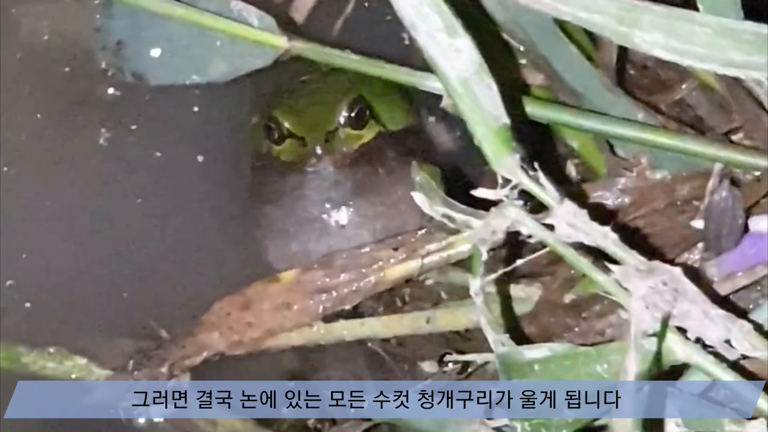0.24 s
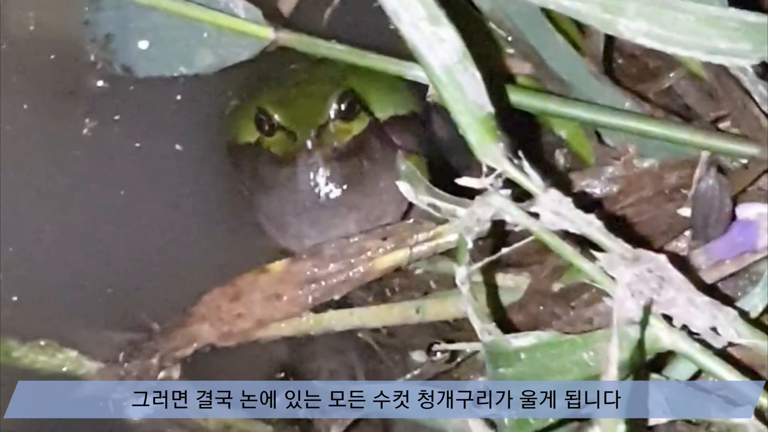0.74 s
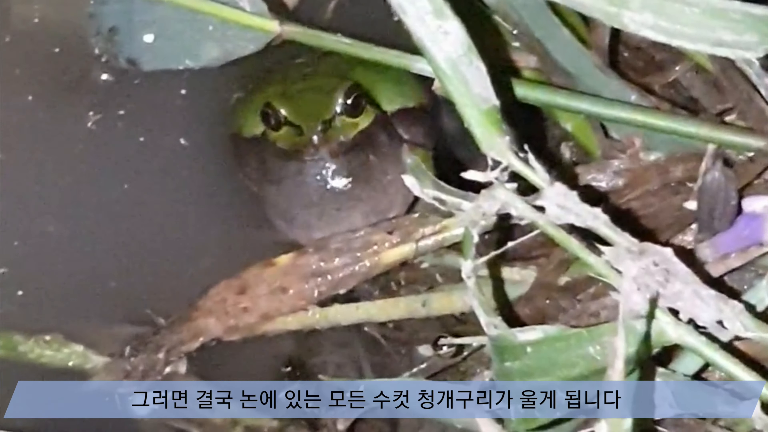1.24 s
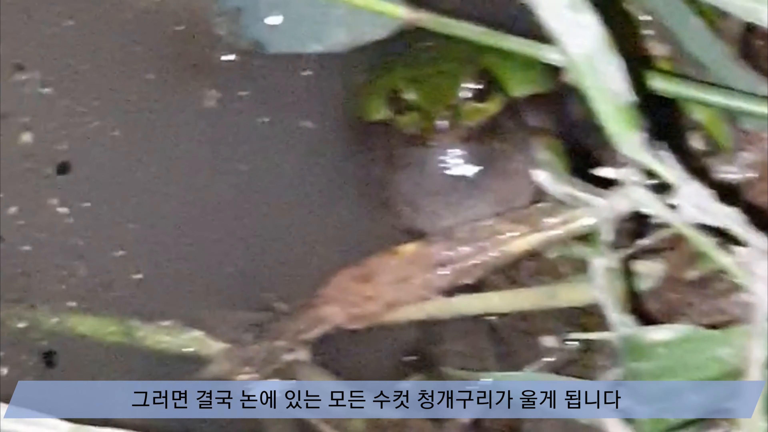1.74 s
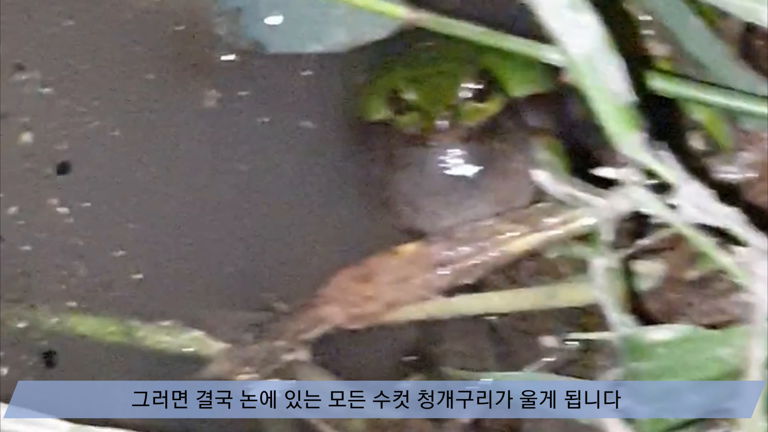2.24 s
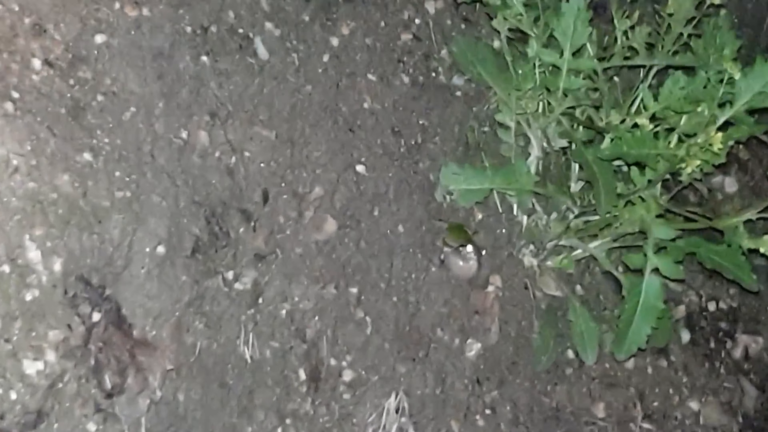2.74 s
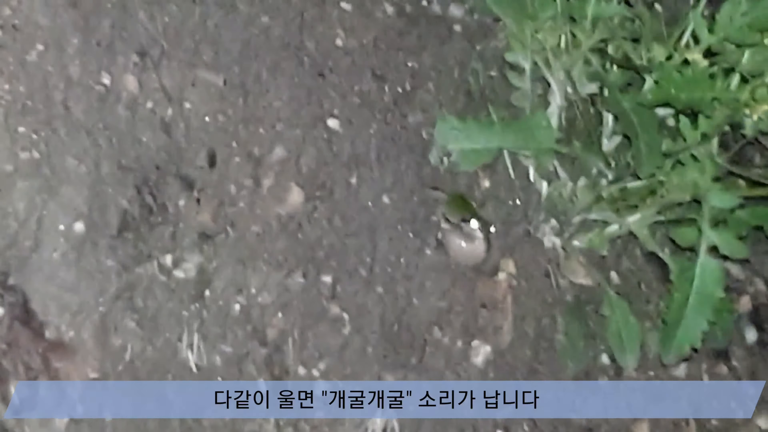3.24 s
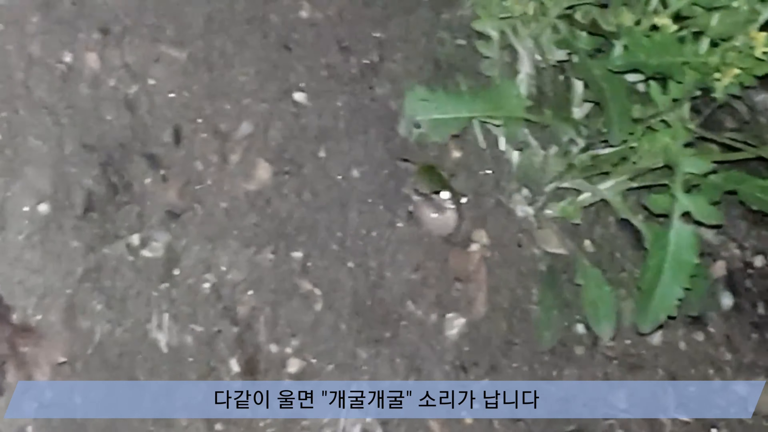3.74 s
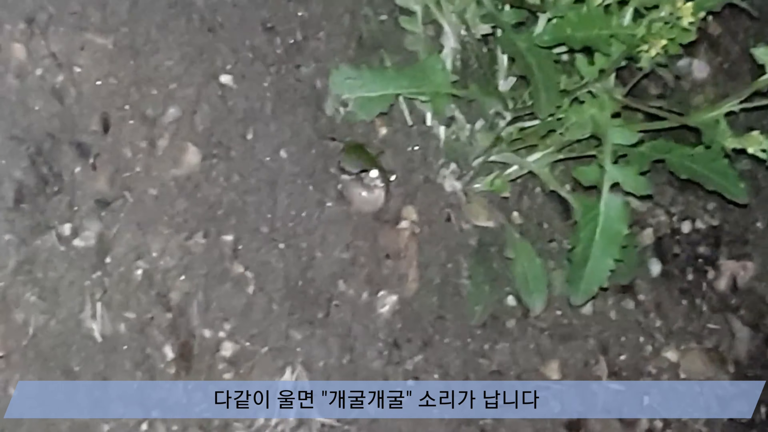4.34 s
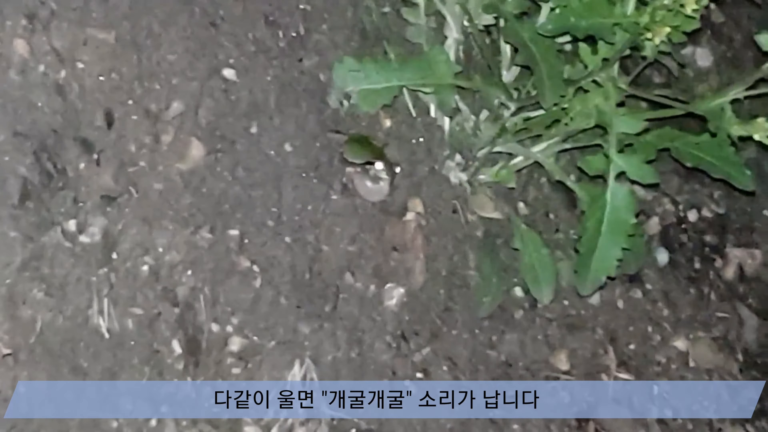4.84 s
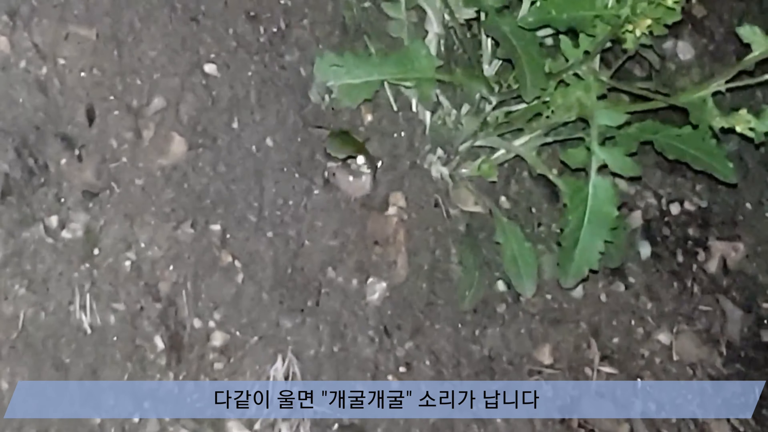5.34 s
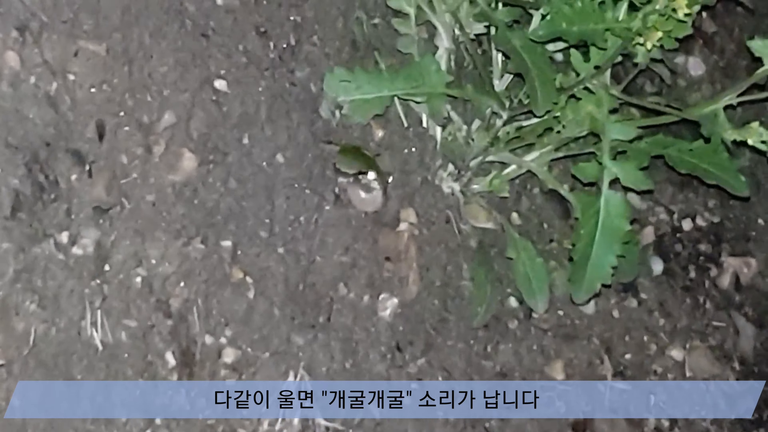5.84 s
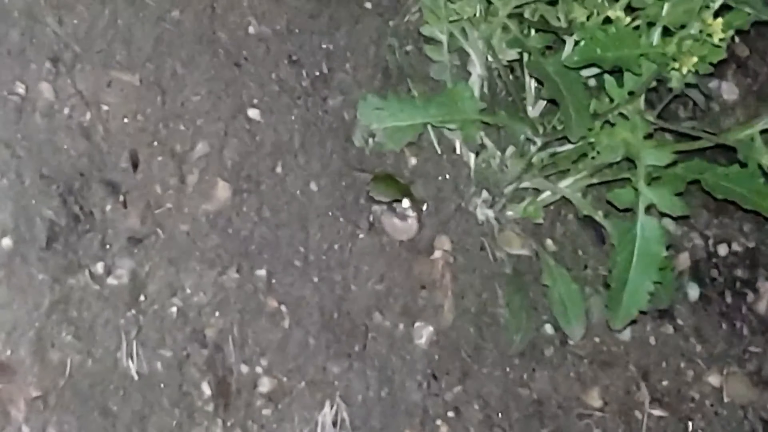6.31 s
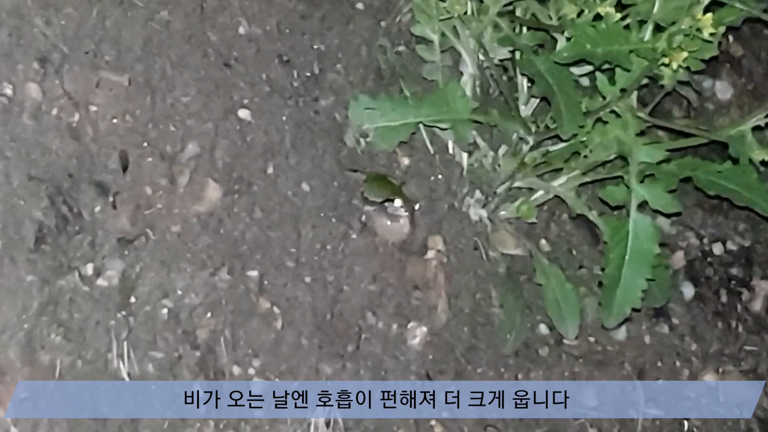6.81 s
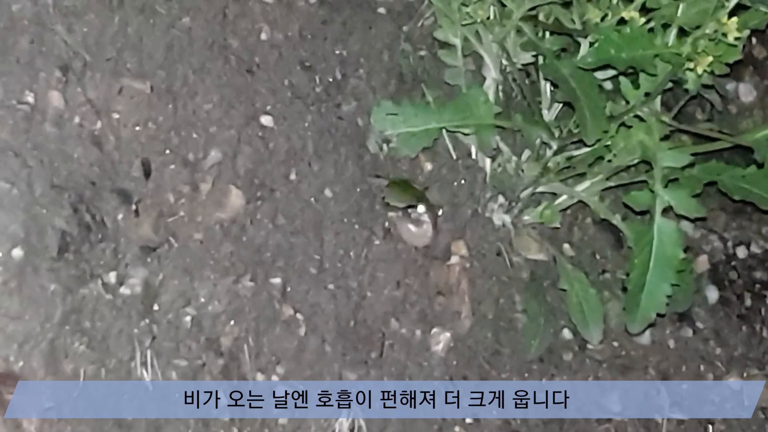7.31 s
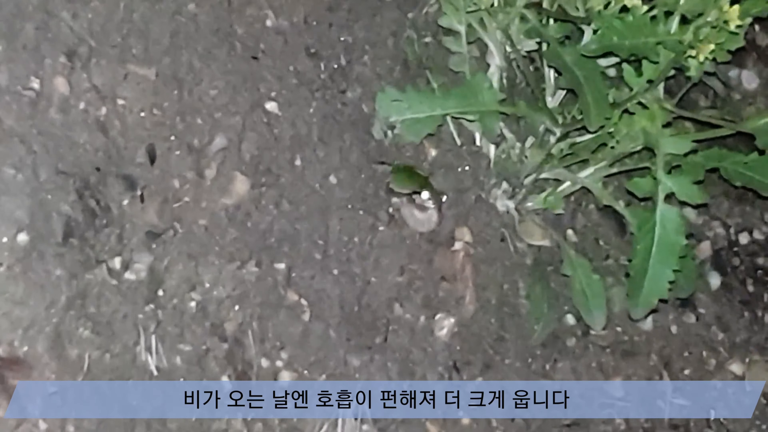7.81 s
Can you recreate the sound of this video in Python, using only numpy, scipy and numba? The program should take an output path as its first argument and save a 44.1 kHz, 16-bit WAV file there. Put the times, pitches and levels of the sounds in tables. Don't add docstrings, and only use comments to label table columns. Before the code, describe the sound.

Night pond frogs: spaced buzzy croaks with a thick chattering chorus, a hard cut, then one close frog repeating rapid croaks on a muddy bank.

```python
import sys
import numpy as np
from scipy import signal
from scipy.fft import rfft, irfft
from scipy.io import wavfile
from scipy.ndimage import uniform_filter1d
from numba import njit

SR = 44100
rng = np.random.default_rng(int(sys.argv[2]) if len(sys.argv) > 2 else 0)


def store_pcm(level_fs):
    pcm = np.round(np.clip(level_fs, -1, 1) * 32767).astype(np.int16)
    wavfile.write(sys.argv[1], SR, np.atleast_2d(pcm).T)


def volts_from_db(level):
    exponent = np.asarray(level, float) / 20
    return 10 ** exponent


N = 355887
T = np.arange(N) / SR
CUT_S, RESUME_S = 2.383, 2.458


def level(x, db):
    return x * volts_from_db(db) / np.sqrt(np.mean(x ** 2))


def curve(rows):
    s, *columns = np.transpose(rows)
    return [np.interp(T, s, c) for c in columns]


def coloured(points):
    hz, db = np.transpose(points)
    f = np.arange(N // 2 + 1) * SR / N + 1e-3
    gain = volts_from_db(np.interp(np.log(f), np.log(hz), db, left=-90))
    return level(irfft(rfft(rng.standard_normal((2, N))) * gain, N), 0)


def walk(rate_hz):
    k = int(SR / rate_hz)
    held = np.repeat(rng.standard_normal(N // k + 1), k)
    return uniform_filter1d(uniform_filter1d(held, k), k)[:N]


@njit
def add_rings(out, s, hz, ring_s, gain, phase):
    for k in range(len(s)):
        first = int(np.floor(s[k] * SR)) + 1
        rate = 2j * np.pi * hz[k] - 1 / ring_s[k]
        z = gain[k] * np.exp(3 + 1j * phase[k] + rate * (first / SR - s[k]))
        step = np.exp(rate / SR)
        for i in range(first, min(first + int(13 * ring_s[k] * SR), len(out))):
            if i >= 0:
                out[i] += ((i / SR - s[k]) / ring_s[k] / 3) ** 3 * z.imag
            z *= step


def echoes(x, t60_s, wet_db, start_ms):
    t = np.arange(int(.4 * SR)) / SR
    tail = rng.standard_normal((2, len(t))) * np.exp(-np.log(1000) * t / t60_s) * (t > start_ms / 1000)
    tail = tail * volts_from_db(wet_db) / np.sqrt(np.sum(tail ** 2, axis=1, keepdims=True))
    return x + signal.fftconvolve(x, tail, axes=1)[:, :N]


def small_source(x, hz, leak_db):
    steep = signal.sosfilt(signal.ellip(4, .5, abs(leak_db), hz, "high", fs=SR, output="sos"), x)
    return signal.sosfilt(signal.butter(2, 0.49 * hz, "high", fs=SR, output="sos"), steep)


# (share of pulses, gap [ms])
PACE = [(0, 8.6), (0.142, 8.0), (0.273, 7.2), (0.621, 6.9), (0.823, 6.3), (0.924, 6.6), (.999, 5.7)]


def pulse_times(marks, times, count):
    gaps = np.interp(np.linspace(0, 1, count - 1), *np.transpose(PACE))
    clock = np.concatenate([[0], np.cumsum(gaps)])
    return np.interp(clock, clock[marks], times)


# (share of pulses, level [dB])
EFFORT = [(0, -3.5), (.07, -0.4), (.2, 2.5), (.4, 3.5), (.85, 3.5), (.93, 0.5), (.999, 3)]
# (frequency [Hz], density [dB per Hz])
RUSH = [(2500, -19), (4500, -6), (6000, 2.5), (7000, 6), (10000, -6.5), (12000, -8.5), (14500, -18),
        (16000, -23.5)]
LEAD_S = 0.000458
SLACK_SHARE = 0.16
LAST_SAG = 0.082


def frog(calls, counts, marks, sac, waver, last_ring, bright_db, pitch=0.94, rush_db=None,
         upper_lag_ms=0, lower_lag_ms=0, fade_db=0, twist_rad=0, climb=0.73, shy_db=0):
    s = np.concatenate([pulse_times(marks, c[:-1], n) for c, n in zip(calls, counts)]) - LEAD_S
    share = np.concatenate([np.linspace(0, 1, n) for n in counts])
    last = share == 1
    slack = np.exp(-share / SLACK_SHARE)
    db = np.repeat([c[-1] for c in calls], counts) + np.interp(share, *np.transpose(EFFORT))
    db = db - 2500 * (share == 0) * np.maximum(np.diff(s, append=s[-1]) - .0093, 0)
    db = db - shy_db * slack
    ring = np.where(last, last_ring, 1.)
    out = np.zeros((2, N))
    for hz0, hz1, ring_ms, left_db, right_db, lead_rad in sac:
        is_upper = hz0 > 2000
        chance = rng.standard_normal((len(s), 4)).T
        loose = waver * min(hz0 / 1500, 2.6) ** 1.5
        hz = pitch * (hz0 + (hz1 - hz0) * share ** climb)
        hz = hz * (1 + .015 * loose * chance[0] - LAST_SAG * last)
        mode_db = db + loose * chance[3]
        mode_db = mode_db - bright_db * slack * min(np.log2(hz0 / 1500), 1)
        mode_db = mode_db - last * (11 if is_upper else 2.5)
        mode_db = mode_db - fade_db * (share - .5) * (hz0 > 5000)
        ring_s = ring * ring_ms / 1000
        rise_s = 3 * ring_s - (upper_lag_ms if is_upper else lower_lag_ms) / 1000
        slip = twist_rad * (1 - share) ** 1.5 * (hz0 < 2000)
        for port, port_db in enumerate((left_db, right_db)):
            phase = np.pi / 2 - 2 * np.pi * hz * rise_s + port * lead_rad + slip
            phase = phase + .45 * loose * chance[1 + port]
            add_rings(out[port], s - rise_s, hz, ring_s, volts_from_db(mode_db + port_db), phase)
    if rush_db is None:
        return out
    puffs = np.zeros(N)
    puff_db = db + rush_db - 4.5 * (share < .1) - 0.49 * share
    add_rings(puffs, s - .0016, 0 * s, np.full(len(s), .00065), volts_from_db(puff_db), 0 * s + np.pi / 2)
    return out + puffs * coloured(RUSH)


# (first pulse [s], second [s], fourth [s], last [s], level [dB])
POND = [
    (.0125, .0208, .0361, .1027, -14),
    (.3663, .3787, .3936, .4636, -13.5),
    (.6664, .6768, .693, .764, -13.5),
    (.9794, .9892, 1.0054, 1.0756, -13.5),
    (1.5629, 1.5757, 1.5905, 1.6586, -14),
    (2.3275, 2.3357, 2.3509, 2.4205, -15.2),
]
# (start [Hz], end [Hz], ring [ms], left [dB], right [dB], right phase lead [rad])
POND_SAC = [(1230, 1434, 0.75, -5, -13.5, 1), (1490, 1784, 0.58, -9, -6, 0.25),
            (2070, 2480, 0.88, -17, -8, 1.5), (2540, 2836, 1, -11.5, -2, -2),
            (2930, 3230, 0.32, -3, -9, -3), (4340, 4720, 0.5, -20.5, -23, 1.26),
            (5360, 5850, 0.21, -20.5, -22.5, 1.5), (6120, 7200, 0.98, -33, -28, -2),
            (6900, 8500, 0.38, -28.5, -29.5, -2), (794, 785, 0.53, -19, -18.5, -1),
            (9200, 8800, 0.5, -48, -40, 3), (12600, 15000, 0.29, -53.5, -59, 3.5)]


def pond_male():
    voice = frog(POND, [16] * len(POND), [0, 1, 3, -1], POND_SAC, waver=.15, last_ring=2.1,
                 fade_db=9, bright_db=1.5, twist_rad=3.6, climb=.55, shy_db=1.5, rush_db=-40,
                 upper_lag_ms=0.15)
    return echoes(voice, t60_s=.04, wet_db=-17, start_ms=1.5)


BOUNCE_MS, BOUNCE_DB = (1.95, 2.084), (-12.5, -11)


def bounce(x):
    dull = signal.sosfilt(signal.butter(2, 2430, fs=SR, output="sos"), x)
    late = [volts_from_db(db) * np.interp(T - ms / 1000, T, port)
            for port, ms, db in zip(dull, BOUNCE_MS, BOUNCE_DB)]
    return x + np.array(late)


# (first pulse [s], fourth [s], last [s], level [dB])
BANK = [(2.5756, 2.5995, 2.6733, -18.4), (2.8417, 2.8651, 2.9385, -18.5), (3.1067, 3.1303, 3.2044, -18.5),
        (3.3742, 3.398, 3.4725, -18.7), (3.639, 3.663, 3.7369, -18.5), (3.9054, 3.9297, 4.0041, -18.5),
        (4.1756, 4.1994, 4.2732, -17.9), (4.4417, 4.4669, 4.5418, -15.6), (4.7258, 4.7513, 4.8257, -14.4),
        (5.153, 5.179, 5.2582, -13.7), (5.5519, 5.578, 5.6572, -13.9), (5.8258, 5.8506, 5.9253, -13.9),
        (6.0941, 6.1193, 6.1934, -14.0), (6.3625, 6.3877, 6.462, -13.8), (6.753, 6.7803, 6.8622, -13.9),
        (7.0256, 7.0509, 7.1246, -13.8), (7.2978, 7.3237, 7.3987, -13.8), (7.5685, 7.595, 7.6708, -13.9),
        (7.8445, 7.8713, 7.9473, -13.9)]
# (start [Hz], end [Hz], ring [ms], left [dB], right [dB], right phase lead [rad])
BANK_SAC = [(1674, 1809, 0.54, -2.5, -7.5, 0.049), (1880, 2140, 0.64, -16, -31.5, 0.28),
            (3287, 3600, 0.42, -2.5, -7.5, 1.1), (3066, 3344, 1, -21, -18, 0.8),
            (2335, 2797, 0.74, -22, -16, 2.1), (2420, 2430, 0.19, -28.5, -11, 0.97),
            (4280, 4390, 0.62, -41, -29, 0.99), (4900, 5550, 0.31, -29.5, -32, 1.58),
            (6800, 7050, 0.28, -36.5, -34, 2.2), (12500, 13000, 0.3, -57, -55, 0.28),
            (9900, 11640, 0.35, -45, -43.5, 1.9), (980, 1060, 0.26, -17, -16.5, 0.099)]
LONG_CALL_S = .104


def bank_male():
    counts = [15 + (c[2] - c[0] > LONG_CALL_S) for c in BANK]
    voice = frog(BANK, counts, [0, 3, -1], BANK_SAC, waver=.1, last_ring=1.5, bright_db=6.5,
                 twist_rad=2.65, rush_db=-41, upper_lag_ms=0.44, lower_lag_ms=-.22)
    return echoes(bounce(voice), t60_s=0.04, wet_db=-13, start_ms=2.2)


TRY_S, TRY_DB, TRY_HZ = .0125, -21, 1730


def tries():
    s, *_, db = np.transpose(BANK)
    early, spread_db = rng.standard_normal((len(s), 2)).T
    out = np.zeros(N)
    gain = volts_from_db(db + TRY_DB + 2.0 * spread_db)
    add_rings(out, s - TRY_S + 0.001 * early, 0 * s + TRY_HZ, 0 * s + 0.00039, gain, 0 * s)
    return np.array([out, 0.21 * out])


def answering(calls, sac):
    calls = [(s, s + length, db) for s, length, db in calls]
    voice = frog(calls, [16] * len(calls), [0, -1], sac, waver=.15, last_ring=2.6, bright_db=8,
                 rush_db=-31, climb=.65, shy_db=3)
    return echoes(voice, t60_s=.07, wet_db=-16, start_ms=2)


# (first pulse [s], length [s], level [dB])
POND_HIGH = [
    (.0, 0.14, -31),
    (.284, 0.15, -32),
    (.584, 0.12, -34.5),
    (.89, 0.112, -32.5),
    (1.172, 0.11, -34),
    (1.452, 0.113, -33.5),
    (1.746, .112, -34),
    (2.016, 0.11, -33.5),
    (2.295, 0.11, -32),
]
POND_LOW = [
    (.175, 0.084, -36),
    (.48, 0.081, -36.5),
    (.8, 0.096, -40.5),
    (1.07, 0.079, -40),
    (1.3, .1, -35.5),
    (1.62, 0.067, -37),
    (1.875, 0.098, -36),
    (2.15, 0.09, -34.5),
]
BANK_MATE = [(3.76, 0.12, -53.5), (4.603, 0.1, -49.5), (4.9025, 0.096, -37), (5.309, 0.11, -37),
             (5.611, 0.097, -36), (5.883, 0.104, -35.5), (6.0, 0.1, -47.5), (6.164, .099, -36.5),
             (6.519, 0.095, -36), (6.802, .097, -36), (7.077, 0.1, -36.5), (7.3505, 0.096, -36.5),
             (7.633, 0.092, -36.5), (7.929, 0.094, -36.5)]
# (start [Hz], end [Hz], ring [ms], left [dB], right [dB], right phase lead [rad])
HIGH_SAC = [(3010, 3497, 0.51, 3.5, 4.5, 0.79), (1520, 1940, 0.43, -34, -7, 0.27),
            (4900, 4900, 0.21, -15, -14.5, 2.5), (5950, 6800, 0.51, -26.5, -28.5, 1.5),
            (9100, 10300, 0.6, -32.5, -32.5, 1.4)]
LOW_SAC = [(1150, 1370, 0.68, -3.5, -30, 0.68), (3100, 3600, 0.18, 4, 2, 2.7),
           (5130, 5340, 0.14, -11.5, -17, .4)]
MATE_SAC = [(1340, 1500, 0.93, -1, -29, 0.43), (2950, 3567, 0.52, -3, 6.5, 1),
            (2380, 2130, 0.22, -4, -5, 0.22), (3980, 4000, 0.51, -7.5, -4.5, .3),
            (5200, 5460, 0.44, -17, -18, .3), (6250, 6700, 0.38, -45, -24, .3),
            (8500, 9260, 0.45, -22, -26, .3)]


def neighbours():
    return answering(POND_HIGH, HIGH_SAC) + answering(POND_LOW, LOW_SAC) + answering(BANK_MATE, MATE_SAC)


# (time [s], level [dB])
NIGHT_DB = [(0, -43), (.9, -40.5), (1.4, -42), (2.2, -41.5), (2.34, -46.5), (2.4, -57), (2.46, -56.5),
            (3.3, -54.5), (4.3, -55.5), (4.8, -49.5), (5.5, -50.5), (6.1, -51), (6.6, -49), (7.2, -51),
            (8.07, -51)]
UPPER_DB = (2, 2)


def chorus():
    low, high = 0, 0
    for pace, pitch, db, side, lead in rng.standard_normal((24, 5)):
        starts = np.cumsum(.3 + .03 * pace + .03 * rng.random(36)) - .7 + .1 * lead
        calls = [(s, s + .1, 2.5 * db) for s in starts]
        left_db, right_db = 3.7 * side, -2.5 * side
        lower = [(1300, 1420, .5, left_db, right_db, 3.2 * lead),
                 (2000, 2150, .3, left_db - 9, right_db - 9, 2.6 * lead)]
        upper = [(hz, 1.126 * hz, ms, left_db + top_db, right_db + top_db, 2.54 * lead)
                 for hz, ms, top_db in [(2769, 0.54, 0), (4130, 0.058, -17.0),
                                        (5830, 0.24, -39), (8500, 0.23, -36.5)]]
        low = low + frog(calls, [16] * 36, [0, -1], lower, waver=0.56, last_ring=0.23,
                         bright_db=14.0, pitch=1 + .12 * pitch)
        high = high + frog(calls, [16] * 36, [0, -1], upper, waver=0.53, last_ring=3.5,
                           bright_db=-1.0, pitch=1 + .028 * pitch)
    low_db = curve(NIGHT_DB)[0]
    high_db = low_db + np.where(T < CUT_S, *UPPER_DB)
    low, high = (level(echoes(b, t60_s=.2, wet_db=-1, start_ms=3), 0) for b in (low, high))
    far = low * volts_from_db(low_db - 1.5) + high * volts_from_db(high_db + 1.5)
    at_pond = small_source(far, hz=1130, leak_db=-26.0)
    at_bank = small_source(far, hz=1111, leak_db=-11.0)
    return np.where(T < CUT_S, at_pond, at_bank)


def wings(hz, orders_db):
    phase = 2 * np.pi * np.cumsum(hz) / SR
    return sum(np.sqrt(2) * volts_from_db(db) * np.sin((k + 1) * phase) for k, db in enumerate(orders_db))


# (time [s], wing rate [Hz], level [dB])
MOSQUITOES = [
    [(.69, 656, -99), (.72, 655, -65), (.86, 635, -67), (.92, 647, -74), (1.0, 660, -68), (1.48, 662, -64),
     (1.6, 643, -68.5), (2.29, 626, -63.5), (2.36, 618, -100)],
    [(.8, 551, -93), (.86, 580, -71), (.93, 612, -66), (1.0, 635, -73), (1.2, 609, -71), (1.36, 620, -66),
     (1.42, 610, -100)],
]
# (time [s], wing rate [Hz], order 1 [dB], order 2 [dB], order 3 [dB])
FLY = [
    (4.04, 160, -97, -91, -96),
    (4.088, 159, -96, -73, -79),
    (4.12, 160, -72, -68, -73),
    (4.138, 152, -65, -70, -70),
    (4.156, 159, -60, -67, -70),
    (4.21, 165, -91, -99, -96),
    (4.5, 155, -76, -95, -99),
    (5.3, 155, -78, -95, -99),
    (5.7, 155, -95, -99, -99),
]


def insects():
    whine = 0
    for rows in MOSQUITOES:
        hz, db = curve(rows)
        present = (T > rows[0][0]) * (T < rows[-1][0])
        whine = whine + wings(hz * (1 + 0.0081 * walk(40)), [db + 2.7 * walk(26.87)]) * present
    hz, *orders_db = curve(FLY)
    fly = wings(hz * (1 + 0.0086 * walk(57)), [*orders_db, orders_db[2] - 13, orders_db[2] - 10])
    fly = fly * (T > FLY[0][0]) * (T < FLY[-1][0])
    return np.array([whine, whine * volts_from_db(5.5) + fly * volts_from_db(3.5)])


# (time [s], level [dB])
TICKS = [
    (2.188, -36),
    (2.206, -45),
    (2.218, -33),
    (2.3813, -24),
    (2.388, -12),
]


def dry_ticks():
    s, db = np.transpose(TICKS)
    out = np.zeros(N)
    add_rings(out, s, np.full(len(s), 5500.), np.full(len(s), .00004), volts_from_db(db), rng.random(len(s)))
    return np.array([out, -.3 * out])


def swell(start_s, length_s, rise_s, fall_s):
    attack = (T - start_s) / rise_s + 1
    release = (start_s + length_s - T) / fall_s + 1
    return np.sin(np.pi / 2 * np.clip(np.minimum(attack, release) / 2, 0, 1)) ** 2


# (start [s], length [s], level [dB], left minus right [dB])
POND_GUSTS = [
    (0, 0.82, -53.5, -28.5),
    (0.893, .14, -46.5, -29.5),
    (1.02, 0.15, -50.5, -21),
    (1.213, 0.056, -42, 13),
    (1.28, 0.4, -53.5, -15),
    (1.738, 0.072, -47.5, -31),
    (2.026, 0.064, -43.5, -20),
    (2.107, 0.047, -47.5, -6),
    (2.164, 0.072, -53, -32.5),
    (2.286, 0.16, -57, -30),
]
# (start [s], length [s], level [dB])
BANK_GUSTS = [(2.46, 0.17, -63.5), (2.665, 0.14, -55.5), (2.943, 0.19, -64.5), (3.197, 0.16, -62.5),
              (3.5, 0.17, -64.5), (3.855, 0.097, -60.5), (4.034, 0.21, -64), (4.313, 0.36, -66.5),
              (4.702, 0.2, -62), (4.941, 0.4, -58), (5.355, 0.41, -61.5), (5.806, 0.17, -59.5),
              (6.248, 0.16, -62.5), (6.483, 0.35, -59.5), (6.9, 0.16, -62), (7.13, 0.13, -68),
              (7.397, 0.21, -59.5), (7.66, .45, -57.5)]
BANK_PAN_DB, CALM_DB, GUST_RISE_S, GUST_FALL_S = 2, -73, 0.013, 0.043


def gusts():
    power = volts_from_db(2 * CALM_DB)
    for s, length, db, pan_db in POND_GUSTS + [(*gust, BANK_PAN_DB) for gust in BANK_GUSTS]:
        port_power = volts_from_db(2 * db + np.array([[pan_db], [-pan_db]]))
        power = power + swell(s, length, GUST_RISE_S, GUST_FALL_S) ** 2 * port_power
    return np.sqrt(power)


# (frequency [Hz], density [dB per Hz])
WIND_TONE = [(12, -40), (20, -31.5), (43, 2), (64, 3), (100, -6), (156, -18), (210, -19), (300, -58)]


def wind():
    left, other = coloured(WIND_TONE)
    drone = wings(58 * (1 + 0.0336 * walk(2)), [-4 + 3.8 * walk(11)]) * (T > CUT_S)
    rumble = np.array([left, 0.5 * left + 0.5 * other]) * volts_from_db(1.4 * walk(9.5) - 3.5)
    return (rumble + drone) * gusts()


# (frequency [Hz], density [dB per Hz])
AIR = [(90, 4.5), (160, 8.5), (450, -7.5), (2200, 10.5), (4200, 7), (5500, -17), (15500, -21.5)]
POND_AIR_DB, BANK_AIR_DB = -9.5, -9


def night_air():
    spectrum = rfft(coloured(AIR))
    f = np.arange(N // 2 + 1) * SR / N + 1e-3
    out = 0
    for octave in range(6, 15):
        layer = np.clip(1 - np.abs(np.log2(f) - octave), 0, 1)
        out = out + irfft(spectrum * layer, N) * volts_from_db(2.5 * walk(9.1) + 2.5 * walk(21))
    return out * volts_from_db(curve(NIGHT_DB)[0] + np.where(T < CUT_S, POND_AIR_DB, BANK_AIR_DB))


def scene_change():
    s = [CUT_S - .001, CUT_S + 0.00053, CUT_S + 0.0084, CUT_S + 0.012,
         RESUME_S - .012, RESUME_S - .001, RESUME_S]
    return volts_from_db(np.interp(T, s, [0, -22, -26, -90, -70, -28, 1]))


def scene():
    pond_side = small_source(pond_male() + neighbours(), hz=1023, leak_db=-11.0)
    bank_side = small_source(bank_male(), hz=1327, leak_db=-20)
    frogs = pond_side - bank_side + chorus()
    return (frogs + tries() + insects() + dry_ticks() + wind() + night_air()) * scene_change()


def top_cut(x):
    return signal.sosfilt(signal.butter(12, 15830, fs=SR, output="sos"), x)


def record(dry):
    mix = signal.sosfilt(signal.ellip(8, .3, 60, 15800, fs=SR, output="sos"), dry)
    return top_cut(mix)


dry = scene()
out = record(dry)
store_pcm(out)
```